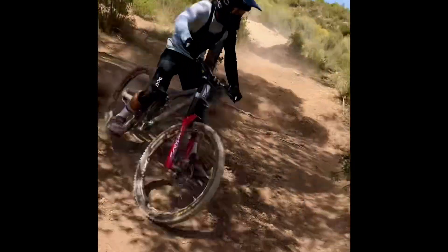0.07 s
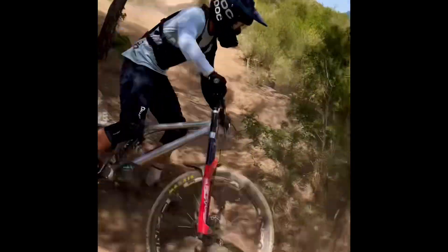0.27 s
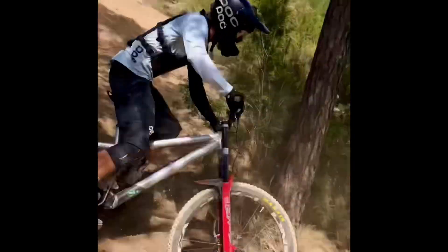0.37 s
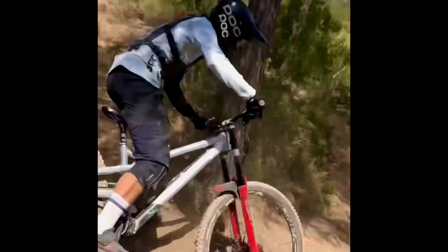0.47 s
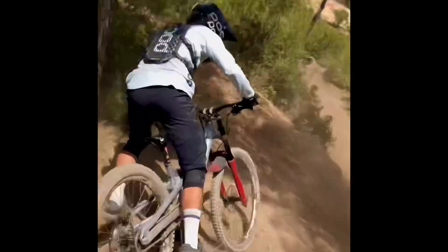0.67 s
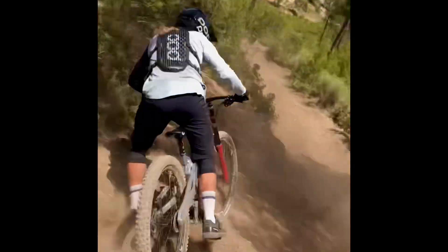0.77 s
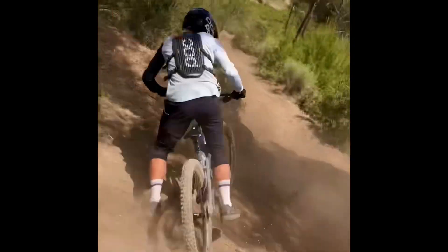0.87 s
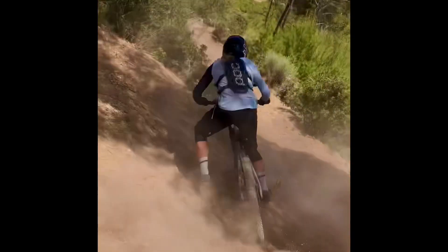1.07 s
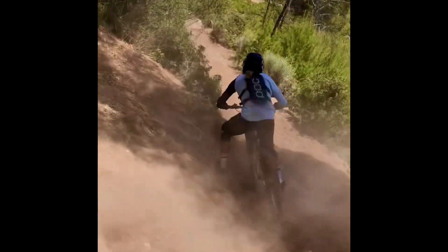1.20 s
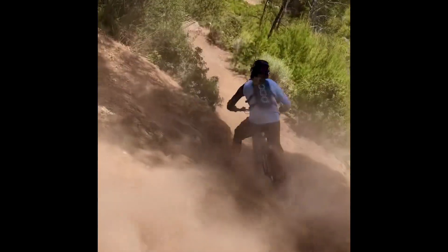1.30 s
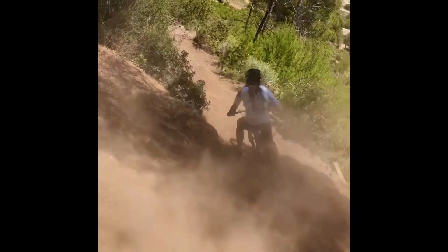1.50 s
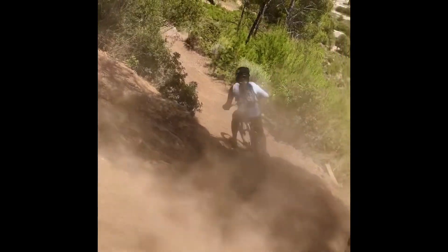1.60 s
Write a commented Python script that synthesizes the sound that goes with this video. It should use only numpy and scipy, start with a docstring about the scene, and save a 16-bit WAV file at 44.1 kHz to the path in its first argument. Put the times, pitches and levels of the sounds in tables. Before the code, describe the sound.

A mountain bike crunches by on dry dirt, skidding and spraying small stones.

```python
"""Knobbed tyres crunch and thud over loose dry dirt as a mountain bike corners past and rides away.
The knobs crush the dirt in tiny impacts that ring the tyre and shake the ground; the tyre's air cavity
hums under the load of the turn. The rear wheel skids, throwing up grit and pebbles that patter down
close by. One stone pings, and a heavy one lands with a hollow thump."""
import sys
import numpy as np
from scipy import signal
from scipy.fft import rfft, irfft, next_fast_len
from scipy.io import wavfile
from scipy.ndimage import map_coordinates

SR = 44100
rng = np.random.default_rng(int(sys.argv[2]) if len(sys.argv) > 2 else 0)


def store_pcm(level_fs):
    """Save levels as 16-bit WAV."""
    pcm = np.round(np.clip(level_fs, -1, 1) * 32767).astype(np.int16)
    wavfile.write(sys.argv[1], SR, np.atleast_2d(pcm).T)


N = 72765

# Tyre crunch envelope. Each row: time in seconds, level in dB.
CRUNCH_ENVELOPE = [(0, -39), (.035, -36), (.05, -44), (.12, -35.5), (.18, -38), (.218, -38.5),
                   (.232, -31.5), (.37, -28.5), (.45, -32), (.5, -31), (.57, -30.5), (.7, -34.5),
                   (.88, -37), (1.02, -42.5), (1.06, -39.5), (1.13, -37), (1.22, -35.5), (1.38, -40.5),
                   (1.48, -36.5), (1.6, -45), (1.65, -36.5)]
# Crushed dirt spectrum. Each row: frequency in Hz, relative level in dB.
CRUNCH_SPECTRUM = [(40, -43), (130, -18.5), (250, 4), (450, 3), (750, 1), (1300, 0.5), (2200, -4.5),
                   (3500, -10), (7000, -17), (16000, -52)]


def tyres(ring_hz=244, ring_width_hz=39, ring_db=-13):
    """Knobs crush the dirt in dense small impacts, which also ring the hollow tyre."""
    impacts = grains(count=6000, hz=2500, spread=.9, cycles=1.2, scatter_db=3.5, samples=200)
    crunch = unit(colour(impacts, CRUNCH_SPECTRUM) + 1.07 * colour(noise(), CRUNCH_SPECTRUM))
    flicker = amp(1.8 * wobble(69.95))
    ring = unit(resonate(noise(), ring_hz, ring_width_hz))
    return level(CRUNCH_ENVELOPE) * (flicker * crunch + amp(ring_db) * ring)


# Tyre knocks. Each row: peak time in seconds, level in dB, Gaussian width in seconds, pitch in Hz.
KNOCKS = [(0.015, -31, 0.0099, 653), (0.029, -29, 0.005, 718), (0.174, -29, 0.0048, 450),
          (0.183, -32, 0.0013, 520), (0.209, -19.5, 0.0017, 739), (0.235, -30.5, 0.0051, 1173),
          (0.258, -26.5, .002, 869), (0.27, -26, 0.0038, 720), (0.35, -38.5, 0.0099, 100),
          (0.366, -32, 0.0061, 955), (0.476, -28, 0.0046, 199.8), (0.499, -24, 0.0029, 681),
          (.528, -25, 0.0037, 441), (0.56, -27, 0.0061, 1280), (0.623, -30, .005, 225.4),
          (0.708, -31.5, .006, 230), (0.781, -33, 0.0065, 621), (0.809, -37, 0.0051, 930),
          (0.886, -35, 0.0047, 979), (1.058, -28.5, 0.0028, 524), (1.086, -27.5, 0.0036, 1080),
          (1.086, -31, 0.0038, 460), (1.201, -31, 0.005, 911), (1.226, -27.5, 0.0028, 1080),
          (1.424, -30.5, 0.004, 400), (1.462, -37.5, 0.0025, 390)]


def bumps(tone_db=-2.5):
    """Wheels knock dully on stones and ruts: a few cycles of pitch in rough noise."""
    out, t = np.zeros(N), np.arange(N) / SR
    for peak_s, db, width_s, hz in KNOCKS:
        window = np.exp(-.5 * ((t - peak_s) / width_s) ** 2)
        body = resonate(noise(), hz, 0.9 * hz)
        rough = unit(filtered(body, lambda f: 1 / np.sqrt(1 + (f / (1.75 * hz)) ** 8)))
        tone = np.sin(2 * np.pi * (hz * t + rng.random()))
        knock = window * (rough + amp(tone_db) * tone)
        out += amp(db) * knock * np.sqrt(np.sum(window ** 2) / np.sum(knock ** 2))
    return out


# Pebble landings, after one low, slow crunch of dirt at 0.168 s. Each row: start in seconds, peak in dB, pitch
# in Hz, crumble T60 in seconds.
LANDINGS = [(0.1681, -24, 2000, 0.098), (0.1924, -22, 3970, 0.011), (0.242, -24, 10100, 0.0045),
            (.3393, -21.5, 5670, 0.0037), (0.4304, -19, 7800, 0.013), (0.4673, -5, 7600, 0.0043),
            (0.507, -19, 8000, .003), (0.618, -14.5, 6860, 0.0046), (0.6446, -17, 8100, 0.0027),
            (.674, -17, 8200, .005), (0.687, -19, 7500, .008), (0.6931, -13.5, 7000, 0.0028),
            (0.7066, -13.5, 6000, 0.0085), (0.7094, -17, 6500, 0.0045), (0.748, -18, 9000, .003),
            (0.7827, -9.5, 8700, 0.0035), (.791, -10.5, 9000, 0.004), (.8566, -11.5, 8600, .004),
            (.866, -16.5, 9000, 0.0088), (.941, -23, 9450, 0.0027), (.9444, -20, 6500, .002),
            (0.973, -18, 8000, .002), (0.9917, -14, 7600, .003), (.9955, -19, 8050, .003),
            (1.0013, -16, 7000, 0.0027), (1.022, -12, 11300, 0.016), (1.044, -12.5, 12500, .003),
            (1.052, -15, 10500, .008), (1.081, -18.5, 7150, 0.0045), (1.147, -15.5, 9600, 0.01),
            (1.1676, -12, 6660, 0.0011), (1.2031, -13.5, 10400, 0.0078), (1.215, -20, 6000, 0.0066),
            (1.227, -15, 7000, 0.0034), (1.2362, -17, 11400, 0.008), (1.2546, -10.5, 5300, 0.0055),
            (1.36, -14, 7200, 0.0046), (1.3674, -25, 8000, 0.0032), (1.4018, -13.5, 7400, 0.0052),
            (1.44, -16, 8500, .003), (1.445, -17, 7400, .005), (1.4992, -21, 9000, .006),
            (1.5318, -21, 5760, 0.002), (1.586, -26, 5500, .003), (1.605, -21, 6700, .002),
            (1.6367, -17, 4250, 0.032)]


def pebbles(max_hop_s=.0022, hop_db=-10.5):
    """Each pebble ticks dryly: a sharp contact, two tiny hops and a brief crumble."""
    out, t = np.zeros(N), np.arange(2048) / SR
    for start_s, db, hz, t60_s in LANDINGS:
        contact = noise(len(t)) * fade(t, t60_s)
        contact[0] += 3.5
        hops_s = np.cumsum(max_hop_s * rng.uniform(.1, 1, 2))
        for k, hop_s in enumerate(hops_s, 1):
            contact[int(hop_s * SR)] += 2.7 * amp(k * hop_db)
        ring = resonate(contact, hz, 0.74 * hz)
        # Band-pass, 0.15 to 3.3 times the pitch.
        tick = filtered(ring, lambda f: (1j * f / (0.15 * hz + 1j * f)) ** 2 / (1 + 1j * f / (3.3 * hz)))
        add(out, start_s, amp(db) * tick / np.abs(tick).max())
    return out


# Hollow thump modes. Each row: frequency in Hz, relative level in dB, T60 in seconds.
THUMP_MODES = [(264, 0.5, 0.11), (422, 7.5, 0.024), (503, 5.5, 0.041), (614, -4, 0.054), (685, 11, 0.016),
               (990, -4, 0.037), (1115, -2.5, 0.034), (2060, 6, 0.0054), (2474, 7, 0.0031),
               (3600, -5, 0.0077)]


def heavy_stone(start_s=1.2827, crumbs_t60_s=0.28):
    """A heavy stone crushes grit as it lands, thumps and scatters crumbs."""
    out, t = np.zeros(N), np.arange(N) / SR
    crack = colour(noise(), [(1000, -18), (2500, 1.5), (4500, -1), (7000, -2), (10000, -2), (16000, -12)])
    attack = 1 - np.exp(-t / 0.00053)
    add(out, start_s - .0021, amp(-8) * crack * attack * fade(t, 0.0092))
    add(out, start_s, amp(-8) * ringing(THUMP_MODES, rise_cycles=0.93))
    low_thud = ringing([(100, 0, 0.11)], rise_cycles=1.1)
    add(out, start_s + 0.0016, amp(-22.5) * low_thud)
    crumbs = grains(count=5000, hz=2800, spread=.7, cycles=3, scatter_db=3, samples=200)
    add(out, start_s, amp(-28.5) * crumbs * fade(t, crumbs_t60_s))
    return out


# Small stone modes. Each row: frequency in Hz, relative level in dB, T60 in seconds.
PING_MODES = [(11600, 4, 0.02), (14720, -4, .02)]


def small_stone(start_s=1.2544):
    """A small stone pings in two high, short modes."""
    out = np.zeros(N)
    add(out, start_s, amp(-19) * ringing(PING_MODES, rise_cycles=1.2))
    return out


# Falling grit envelope. Each row: time in seconds, level in dB.
GRIT_ENVELOPE = [(0, -52), (.13, -55.5), (.2, -51.5), (.3, -49), (.42, -44.5), (.52, -44.5), (.62, -36),
                 (.72, -38), (.88, -37), (.97, -36.5), (1.05, -36.5), (1.12, -37.5), (1.24, -37.5),
                 (1.33, -37.5), (1.45, -43.5), (1.53, -47), (1.62, -47.5)]
# Dust and chip spectra. Each row: frequency in Hz, relative level in dB.
DUST_SPECTRUM = [(300, -44), (1500, -2.5), (3000, -3.5), (5000, -1.5), (8000, 3.5), (11500, 3),
                 (14000, 7.5), (16000, 5)]
CHIP_SPECTRUM = [(800, -22), (2500, -12), (4500, -2.5), (8000, -1), (11500, 6), (16000, -0.5)]


def grit():
    """Thrown dirt rains down in flurries: a hiss of fine dust under clusters of sharp chips."""
    dust = grains(count=11000, hz=9000, spread=.5, cycles=1.5, scatter_db=3, samples=40)
    chips = grains(count=1600, hz=8500, spread=.35, cycles=6, scatter_db=5, samples=90)
    flurry = amp(1.1 * wobble(40.3))
    clusters = amp(4 * np.tanh(wobble(130)))
    hiss = amp(0.5) * colour(dust, DUST_SPECTRUM)
    patter = amp(-3.5) * colour(chips * clusters, CHIP_SPECTRUM)
    return level(GRIT_ENVELOPE) * flurry * (hiss + patter)


def cavity_hum(peak_s=.378, hz=270, rise_s=0.037, fall_s=0.034):
    """The tyre's air cavity sings, swelling with the load of the turn and letting go."""
    t = np.arange(N) / SR - peak_s
    load = np.exp(np.minimum(t / rise_s, -t / fall_s))
    pitch_hz = hz * (1 + 0.038 * wobble(45))
    flicker = amp(2.5 * wobble(52))
    return amp(-27) * load * flicker * np.sin(2 * np.pi * np.cumsum(pitch_hz) / SR)


# Scraped sand spectrum. Each row: frequency in Hz, relative level in dB.
SCRAPE_SPECTRUM = [(200, -23), (700, -15), (1500, 10), (2500, 7), (4500, 2.5), (9000, -13), (16000, -22)]


def skid(judder_hz=191):
    """The sliding rear tyre scrapes through sand and shudders as it passes."""
    sand = grains(count=14000, hz=3500, spread=.6, cycles=2.2, scatter_db=3, samples=100)
    scrape = passing(nearest_s=0.678, width_s=0.072) * colour(sand, SCRAPE_SPECTRUM)
    shake = resonate(resonate(noise(), judder_hz, width_hz=110), judder_hz, width_hz=190)
    judder = passing(nearest_s=0.64, width_s=0.15) * unit(shake)
    return amp(-37) * scrape + amp(-39) * judder


# Ground rumble envelope. Each row: time in seconds, level in dB.
RUMBLE_ENVELOPE = [(0, -40), (.1, -51), (.2, -42), (.4, -42), (.55, -43), (.7, -44), (.9, -45), (1.05, -48),
                   (1.3, -44.5), (1.5, -47.5), (1.65, -55)]
# Ground rumble spectrum. Each row: frequency in Hz, relative level in dB.
RUMBLE_SPECTRUM = [(20, -39), (38, -17), (52, -4.5), (75, 0.5), (120, -0.5), (170, 2), (240, -3),
                   (400, -20), (1000, -51)]


def ground():
    """The ground rumbles under the rolling tyres."""
    return level(RUMBLE_ENVELOPE) * colour(noise(), RUMBLE_SPECTRUM)


def grains(count, hz, spread, cycles, scatter_db, samples, cap_db=11):
    """Tiny damped contacts of random time, pitch and strength, at rms 1."""
    onset, force, decay, polarity = np.hsplit(rng.random((count, 4)), 4)
    pitch_hz = np.minimum(hz * np.exp(spread * rng.standard_normal((count, 1))), SR * .4)
    turns = pitch_hz * np.arange(samples) / SR
    strength = amp(np.minimum(-scatter_db * np.log(1 - force), cap_db)) * np.sign(polarity - .5)
    waves = strength * np.sin(2 * np.pi * turns) * fade(turns, cycles * (.5 + decay))
    index = (onset * N).astype(int) + np.arange(samples)
    return unit(np.bincount(index.ravel(), waves.ravel(), N)[:N])


def ringing(modes, rise_cycles):
    """Decaying modes of a struck body; low ones build up more slowly."""
    t = np.arange(SR // 3) / SR
    out = np.zeros(len(t))
    for hz, db, t60_s in modes:
        attack = 1 - np.exp(-t * hz / rise_cycles)
        out += amp(db) * attack * fade(t, t60_s) * np.sin(2 * np.pi * hz * t)
    return out


def passing(nearest_s, width_s):
    """Gain of a passing source, halved width_s either side of its peak."""
    return 1 / (1 + ((np.arange(N) / SR - nearest_s) / width_s) ** 2)


def noise(samples=N):
    """White noise."""
    return rng.standard_normal(samples)


def wobble(knots_per_s):
    """Smooth random curve."""
    return map_coordinates(noise(1024), [np.arange(N) * knots_per_s / SR], mode="wrap")


def amp(db):
    """Decibels to gain."""
    return 10 ** (np.asarray(db) / 20)


def unit(x):
    """Scale to rms 1."""
    return x / np.sqrt(np.mean(x ** 2) + 1e-20)


def level(envelope):
    """Gain per sample from (s, dB) points."""
    return amp(np.interp(np.arange(N) / SR, *np.transpose(envelope)))


def fade(t, t60):
    """Exponential decay, 60 dB down at t60."""
    return np.exp(-np.log(1000) * t / t60)


def filtered(x, response):
    """Apply a frequency response, given as a function of Hz."""
    size = next_fast_len(len(x) + 8192)
    return irfft(rfft(x, size) * response(np.fft.rfftfreq(size, 1 / SR)), size)[:len(x)]


def colour(x, spectrum):
    """Shape by (Hz, dB) points, at rms 1."""
    hz, db = np.transpose(spectrum)
    return unit(filtered(x, lambda f: amp(np.interp(np.log(f + 1), np.log(hz), db))))


def resonate(x, hz, width_hz):
    """Apply one resonance."""
    return filtered(x, lambda f: 1j * f * width_hz / (hz * hz - f * f + 1j * f * width_hz))


def add(track, start_s, sound):
    """Mix a sound into the track."""
    i = int(np.clip(round(start_s * SR), 0, N - 1))
    track[i:i + len(sound)] += sound[:N - i]


def scene():
    """Bike and thrown dirt, close by in the open air, in mono."""
    bike = tyres() + ground() + cavity_hum() + skid() + bumps()
    debris = grit() + pebbles() + small_stone() + heavy_stone()
    return (bike + debris)[None]


def record(dry, low_cut_hz=50, top_hz=15950):
    """The microphone loses deep bass; the recorder keeps nothing above its band limit."""
    highpass = signal.butter(4, low_cut_hz, "high", fs=SR, output="sos")
    return np.array([filtered(x, lambda f: f < top_hz) for x in signal.sosfilt(highpass, dry)])


dry = scene()
out = record(dry)
store_pcm(out)
```